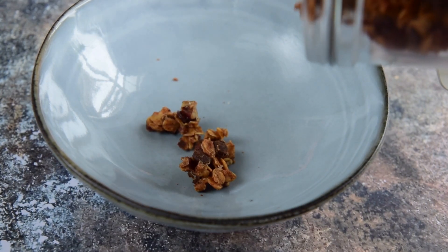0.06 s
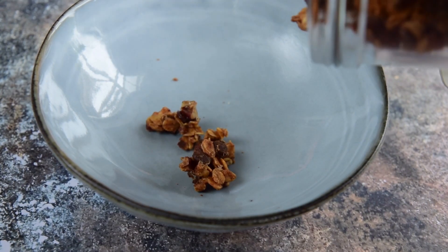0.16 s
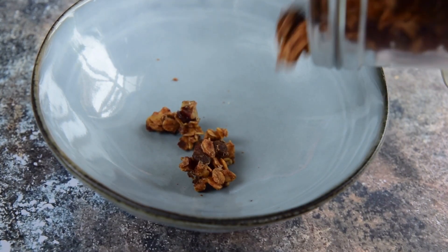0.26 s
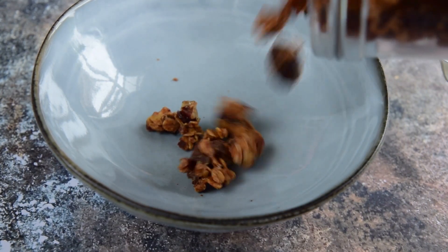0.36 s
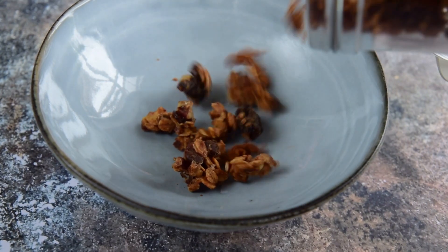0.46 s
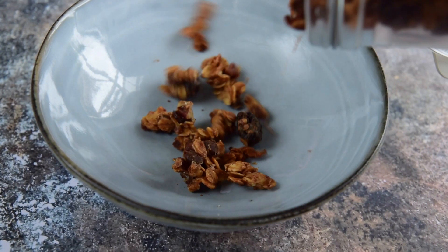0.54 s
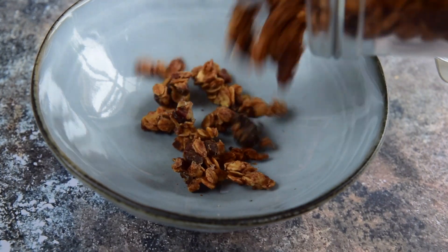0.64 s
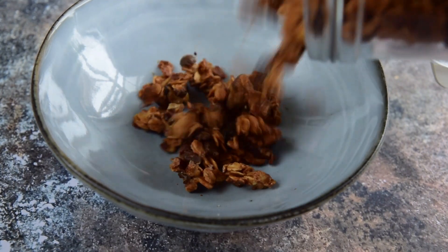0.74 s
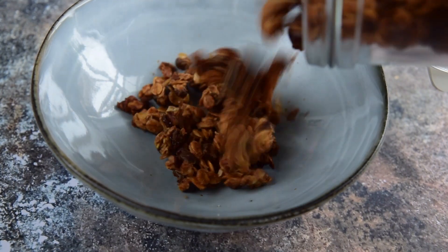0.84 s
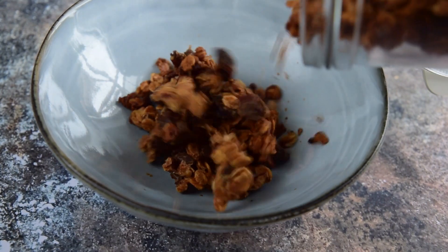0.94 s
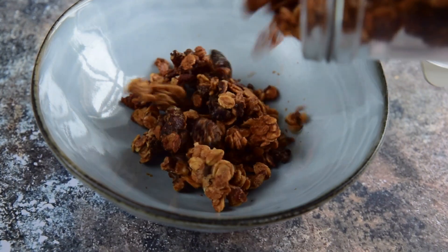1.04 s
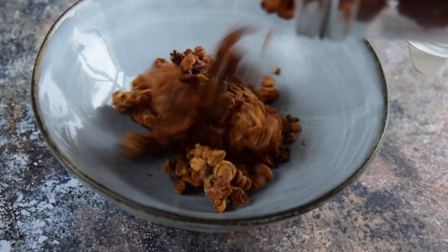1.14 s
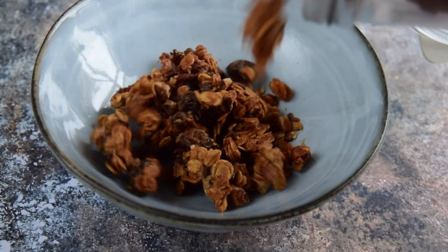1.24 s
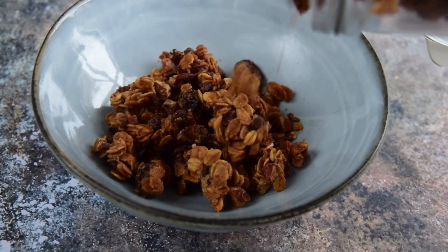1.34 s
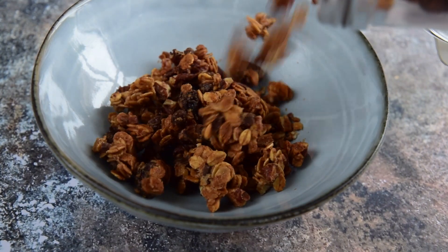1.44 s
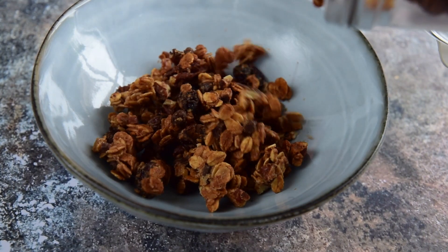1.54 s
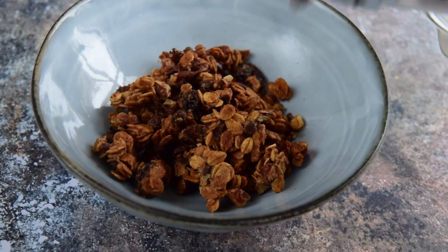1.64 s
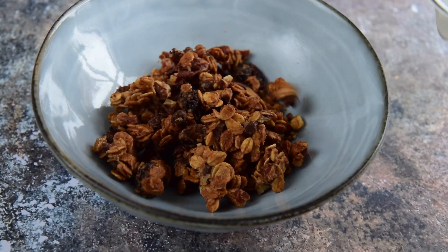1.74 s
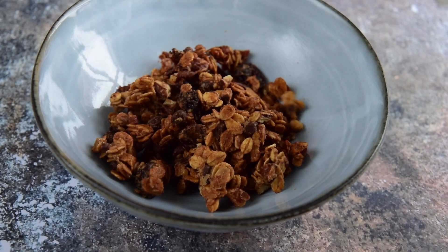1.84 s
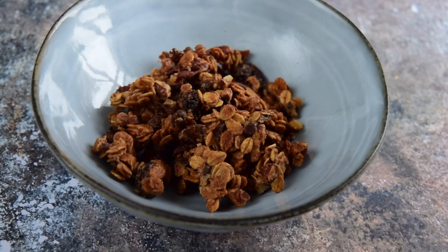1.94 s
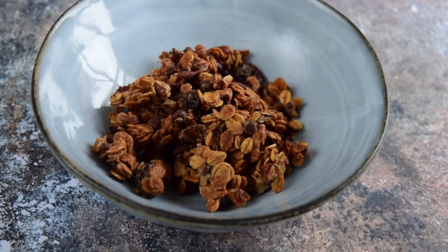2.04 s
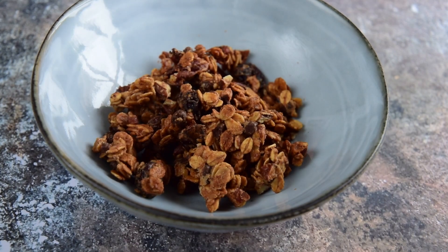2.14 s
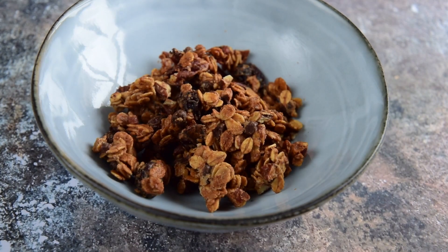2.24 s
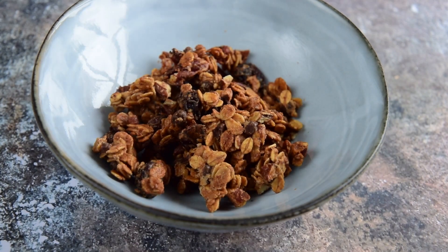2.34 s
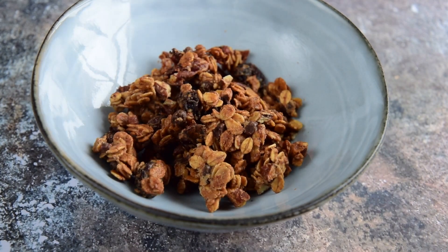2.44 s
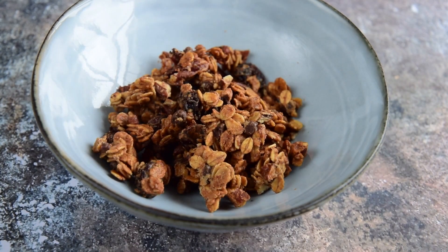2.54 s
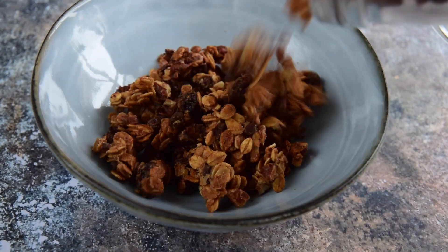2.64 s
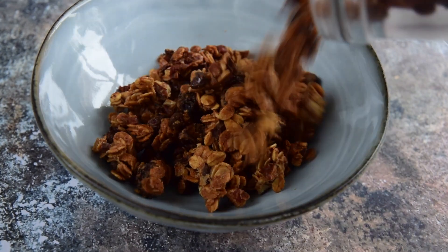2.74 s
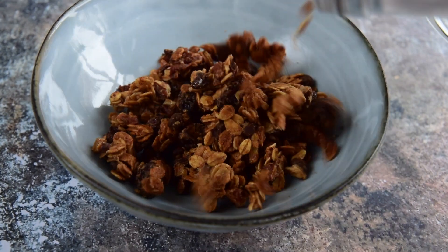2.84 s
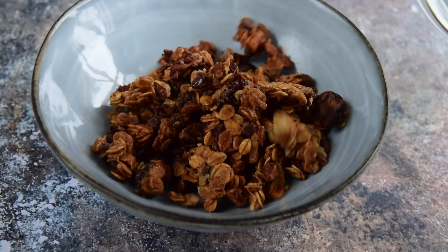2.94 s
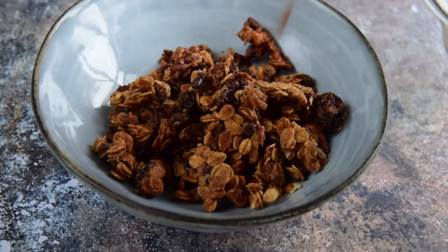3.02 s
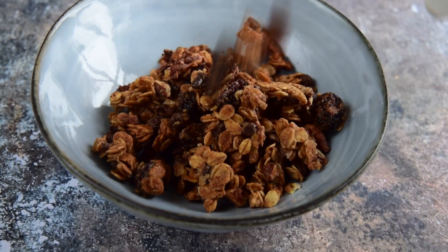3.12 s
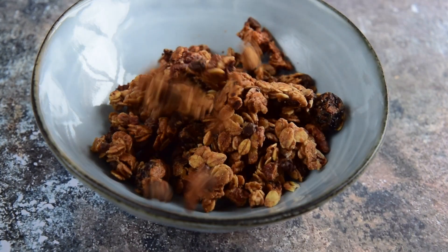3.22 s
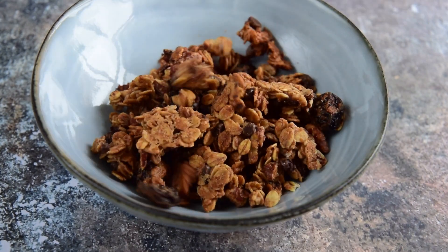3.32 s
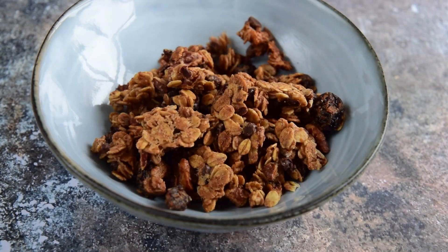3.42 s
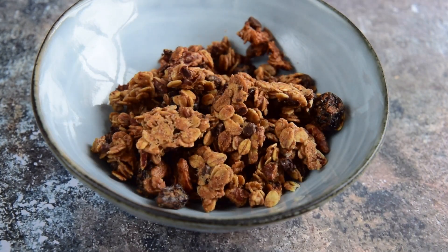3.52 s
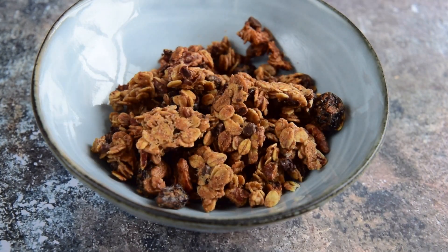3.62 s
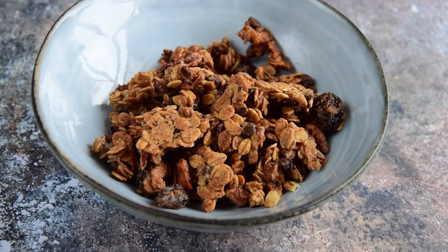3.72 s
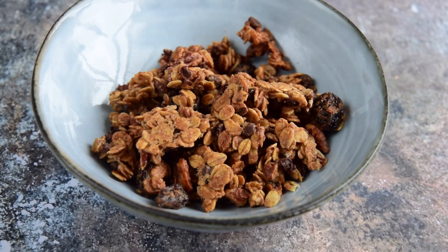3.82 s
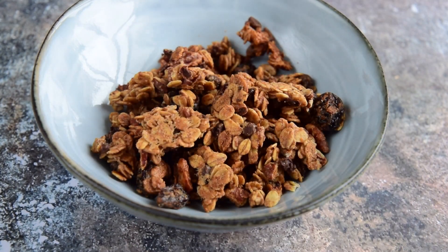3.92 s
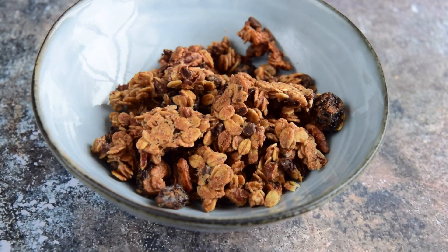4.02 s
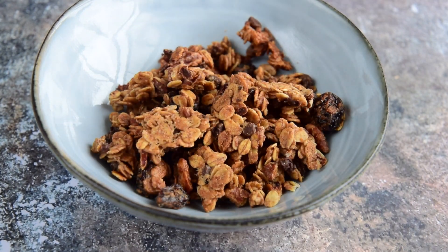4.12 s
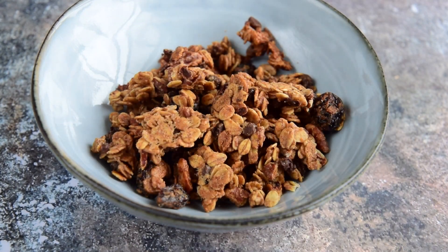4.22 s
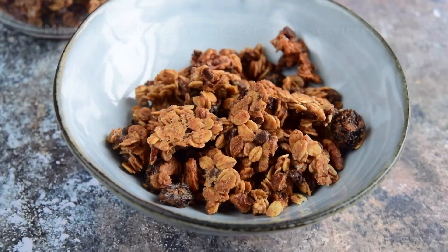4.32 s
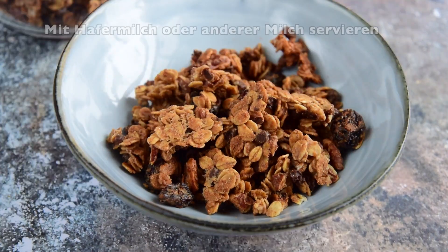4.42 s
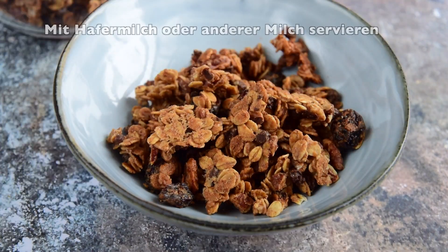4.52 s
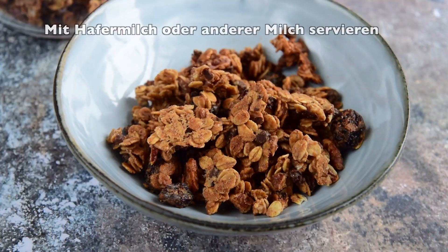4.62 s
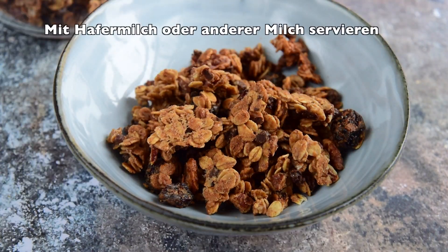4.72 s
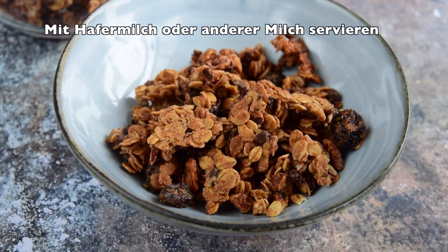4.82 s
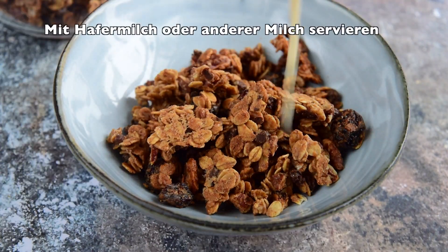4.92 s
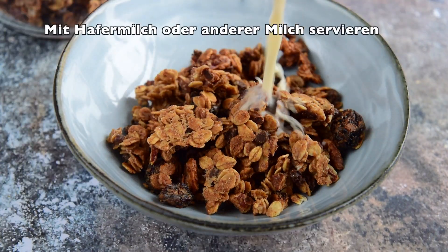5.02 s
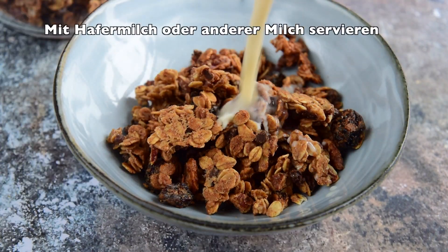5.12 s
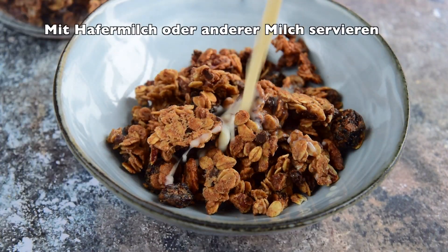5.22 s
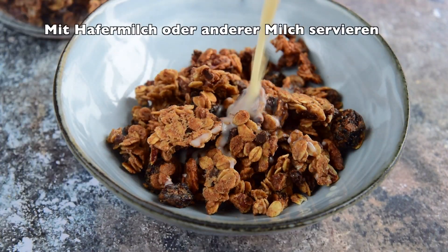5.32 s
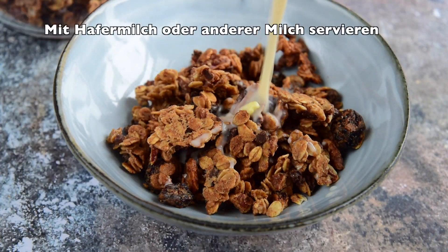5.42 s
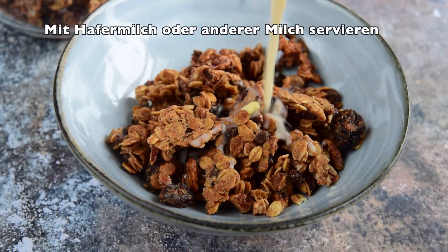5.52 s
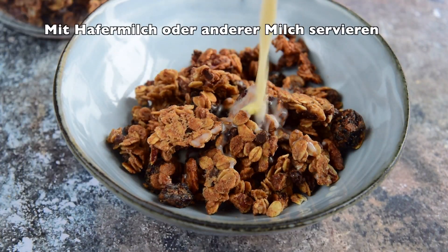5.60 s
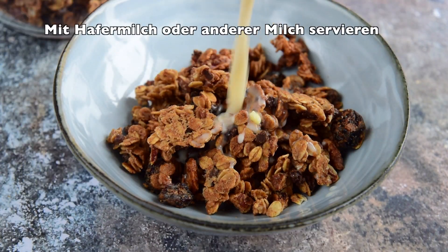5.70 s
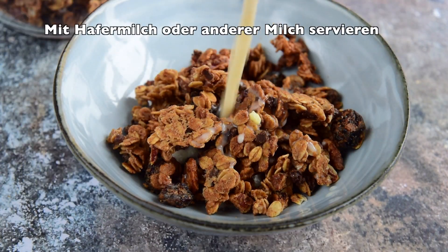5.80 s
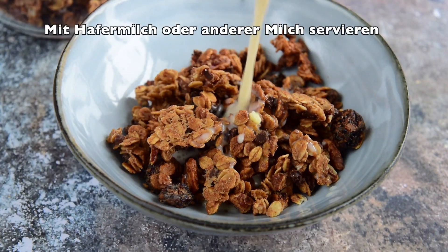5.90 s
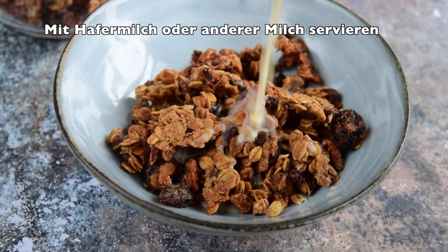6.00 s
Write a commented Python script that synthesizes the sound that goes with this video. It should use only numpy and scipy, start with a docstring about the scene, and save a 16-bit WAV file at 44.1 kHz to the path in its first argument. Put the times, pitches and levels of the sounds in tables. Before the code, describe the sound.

Close in a quiet kitchen, granola scrapes inside a glass jar, then clatters into a ceramic bowl with sharp cracks, dull pops and short bright rings. After a pause, a second, smaller pour follows. The jar rattles, its wire clasp ticks, and it is set down with a loud clack. The background hiss jumps up at a cut, then thin milk spatters, snaps and fizzes over the heap.

```python
"""A quiet kitchen, heard through a nearly mono microphone: granola tumbles from a glass jar into a ceramic bowl.
Two pours: each cluster is a noise crack and a damped dull pop that excite the bowl's modes, over pattering crumbs.
Granola scrapes inside the jar as grains; the jar's glass and wire clasp rattle as modes, and it is set down hard.
After a cut with louder steady noise, milk spatters over the heap: chirped bubbles, snaps, fizz and a gurgle.
"""
import sys
import numpy as np
from scipy import signal
from scipy.fft import rfft, irfft, next_fast_len
from scipy.io import wavfile

SR = 44100
rng = np.random.default_rng(int(sys.argv[2]) if len(sys.argv) > 2 else 0)


def waveform_to_disk(signal):
    """Save audio, clipped to [-1, 1], as 16-bit WAV at the path in sys.argv[1]."""
    frames = np.transpose(np.atleast_2d(signal))
    scaled = np.clip(frames, -1, 1) * 32767
    samples = np.round(scaled).astype(np.int16)
    wavfile.write(sys.argv[1], SR, samples)


N = 266893
CUT_S = 4.335


def amp(db):
    """Decibel law: level to amplitude ratio."""
    return 10 ** (np.asarray(db) / 20)


def unit(x):
    """Normalization to an rms of 1."""
    return x / np.sqrt(np.mean(x ** 2) + 1e-20)


def along(points, hz):
    """Interpolation of (frequency, value) points on a logarithmic frequency axis."""
    f, v = np.transpose(points)
    return np.interp(np.log(hz + 1), np.log(f + 1), v)


def filtered(x, response):
    """Linear filtering: the spectrum times a response of frequency."""
    m = next_fast_len(N + 8192)
    spectrum = rfft(x, m) * response(np.fft.rfftfreq(m, 1 / SR))
    return irfft(spectrum, m)[..., :N]


def shaped(x, spectrum):
    """Spectral coloration by (frequency [Hz], gain [dB]) points."""
    return filtered(x, lambda hz: amp(along(spectrum, hz)))


def train(s, size):
    """Impulsive excitation: one impulse of the given size at each time."""
    return np.bincount(np.round(np.asarray(s) * SR).astype(int), size, N)[:N]


def patter(rate, spread_db):
    """Random impulsive excitation: rate impulses per second on average, very unequal, overall rms 1."""
    size = amp(spread_db * rng.exponential(size=N)) * rng.standard_normal(N)
    return unit(size * (rng.random(N) < rate / SR))


def ring(drive, hz, t60):
    """Modal resonance: an impulse of size 1 starts an exponentially damped sine of size 1."""
    r = amp(-60 / (t60 * SR))
    w = 2 * np.pi * hz / SR
    return signal.lfilter([np.sin(w)], [1, -2 * r * np.cos(w), r * r], drive)


def blips(s, db, hz, cycles, rise):
    """Damped oscillation: short sines with a quick onset, whose pitch climbs with the share rise."""
    t = np.arange(400) / SR
    age = t * (hz / np.clip(cycles, .3, 40))[:, None]  # in lifetimes
    envelope = np.e * 4 * age * np.exp(-4 * age)  # peaks at 1
    chirp = 1 + rise * (np.minimum(age, 2) - .5)
    wave = amp(db)[:, None] * envelope * np.sin(2 * np.pi * hz[:, None] * t * chirp)
    at = np.round(s * SR).astype(int)[:, None] + np.arange(400)
    return np.bincount(at.ravel(), wave.ravel(), N + 400)[:N]


def grains(count, t0, t1, lo_hz, hi_hz, cycles, spread_db, rise):
    """Granular superposition: blips at random times, pitches and sizes; rms 1 while they last."""
    when, size, pitch = rng.random((count, 3)).T
    hz = lo_hz * (hi_hz / lo_hz) ** pitch
    shower = blips(t0 + (t1 - t0) * when, spread_db * size, hz, cycles, rise)
    return unit(shower) * np.sqrt((t1 - t0) * SR / N)


CRACK_S = 0.0067  # t60


def cracks(s, db, lo_hz, hi_hz):
    """Brittle fracture: a brief decaying noise burst at each time; db sets its starting level before the band filter."""
    fade = amp(-60 * np.arange(300) / SR / CRACK_S)
    burst = rng.standard_normal((len(s), len(fade))) * fade
    burst[:, 1:] += 0.68 * rng.uniform(-1.2, 1, (len(s), 1)) * burst[:, :-1]  # some duller, some brighter
    burst *= (amp(db) * np.linalg.norm(fade) / np.linalg.norm(burst, axis=1))[:, None]
    at = np.round(s * SR).astype(int)[:, None] + np.arange(len(fade))
    noise = np.bincount(at.ravel(), burst.ravel(), N + len(fade))[:N]
    band = signal.butter(1, [lo_hz, min(hi_hz, SR / 2.2)], "band", fs=SR)
    return signal.lfilter(*band, noise)


def swells(rows, rise_s):
    """Exponential growth and decay: a gain that rises at each (time [s], level [dB], t60 [s]) and dies away."""
    t = np.arange(N) / SR
    gain = np.zeros(N)
    for s, db, t60 in rows:
        age = np.maximum(t - s, 0)
        gain += amp(db - 60 * age / t60) * (1 - np.exp(-age / rise_s))
    return gain


# kitchen and microphone noise before and after the cut: (frequency [Hz], relative density [dB])
AIR_BEFORE = [(15, -53), (25, -8), (75, -4), (113, -2), (152, -7.5), (189, -6.5), (275, -5), (315, -9),
              (361, -8), (435, -11), (498, -8.5), (555, -12), (618, -10.5), (1310, -15), (15700, -23.5)]
AIR_AFTER = [(15, -37), (25, -11), (55, -2.5), (126, -2), (205, -6), (268, -4.5), (424, -9.5), (854, -7),
             (1630, -11), (1770, -14.5), (4540, -18), (5340, -17.5), (15700, -19)]
# stereo difference: (frequency [Hz], side minus mid [dB])
AIR_SIDE = [(60, -17), (110, -18), (200, -14), (380, -13), (700, -14), (1290, -13), (2380, -9), (4400, -5),
            (8120, -5), (15000, -4)]
AIR_BEFORE_DB, AIR_AFTER_DB = -56, -49  # rms of the mid signal


def air(later):
    """Stationary random noise, louder after the cut; a weak side signal parts left from right."""
    before = unit(shaped(rng.standard_normal((2, N)), AIR_BEFORE))
    after = unit(shaped(rng.standard_normal((2, N)), AIR_AFTER))
    mid, side = np.where(later, amp(AIR_AFTER_DB) * after, amp(AIR_BEFORE_DB) * before)
    side = shaped(side, AIR_SIDE)
    return np.array([mid + side, mid - side])


# the room's decay: (frequency [Hz], t60 [s])
ROOM_DECAY = [(200, 0.96), (2000, 0.23), (10000, 0.13)]


def kitchen(x):
    """Diffuse reverberation: a noise tail in which each frequency dies at its own speed."""
    hz, t, z = signal.stft(rng.standard_normal(SR // 2), SR, nperseg=256)
    decay = amp(-60 * t / along(ROOM_DECAY, hz)[:, None])
    tail = signal.istft(z * decay, SR, nperseg=256)[1]
    delayed = np.pad(x, (250, 0))  # samples
    return signal.fftconvolve(delayed, tail / np.linalg.norm(tail))[:N]


# heavy landings felt through the worktop: (time [s], relative boom level [dB], relative knock level [dB])
THUMPS = [(0.351, -45, -40), (0.385, -45, -45), (.469, -42, -43.5), (0.499, -58, -49), (.698, -41, -42.5),
          (.724, -37, -38), (.817, -40.5, -43.5), (0.878, -39, -47), (0.919, -50, -43.5),
          (0.949, -49, -42.5), (1.157, -38.5, -38), (1.29, -44, -54), (1.329, -40.5, -41),
          (1.386, -44.5, -60), (2.673, -38, -41), (2.77, -37, -49), (2.8, -47, -42.5), (2.849, -48, -56),
          (2.961, -50, -61), (3.16, -49, -50), (3.199, -40.5, -39.5), (3.287, -45.5, -45.5),
          (3.342, -48.5, -67), (3.711, -44, -79)]
# the worktop's low and higher modes: (frequency [Hz], relative level [dB], t60 [s])
BOOM_MODES = [(64.1, -6.5, 0.38), (93.2, 1.5, 0.15)]
KNOCK_MODES = [(184, 3.5, 0.046), (269.3, 4.5, 0.05), (366, -5.5, 0.11)]


def worktop():
    """Structure-borne sound: heavy landings excite the worktop's modes."""
    s, boom_db, knock_db = np.transpose(THUMPS)
    thuds = np.zeros(N)
    for level, modes in ((boom_db, BOOM_MODES), (knock_db, KNOCK_MODES)):
        for hz, db, t60 in modes:
            thuds += ring(train(s, amp(level + db)), hz, t60)
    # a soft push without deep bass
    return filtered(thuds, lambda hz: (1j * hz / (55 + 1j * hz) / (1 + 1j * hz / 450)) ** 2)


# granola shifts inside the jar: (time [s], level [dB], t60 [s])
SLIDES = [(.09, -57, 0.9), (.19, -61, .8), (.26, -58, 0.68), (2.36, -62.5, 1.2), (2.5, -66, .9)]


def slide():
    """Sliding friction as many small impacts: clusters scrape along the tilted jar."""
    scrape = grains(count=1500, t0=0, t1=2.7, lo_hz=890, hi_hz=2610, cycles=3.2, spread_db=18, rise=0)
    return swells(SLIDES, rise_s=0.026) * scrape


# clasp and jar contacts: (time [s], relative glass knock level [dB], relative wire tick level [dB])
RATTLES = [(0.1014, -54, -71), (0.135, -51, -49), (0.163, -45, -52), (0.1966, -45, -52.5),
           (0.2654, -45, -52), (0.3045, -44, -47), (0.5801, -35.5, -43), (2.372, -57, -62),
           (2.4224, -53, -63), (2.438, -48.5, -48.5), (2.511, -55, -52), (2.5628, -54, -54),
           (2.61, -54, -57), (3.6252, -48.5, -60), (3.6804, -47, -54), (3.7352, -60, -54),
           (3.7507, -51, -50), (3.807, -52, -45), (3.8327, -62, -50), (3.8678, -47, -51), (3.961, -52, -42),
           (4.0014, -50, -41), (4.033, -53, -64), (4.1359, -19, -36.5), (4.143, -29.5, -39.5),
           (4.293, -40.5, -47.5), (4.334, -57, -46), (4.4345, -51, -44), (4.4417, -68, -48)]
# modes of the glass and of the wire clasp: (frequency [Hz], relative level [dB], t60 [s])
GLASS_MODES = [(670, -20, 0.021), (856, -19, 0.034), (1001, -14, 0.047), (1290, -13, 0.035),
               (1490, -6.5, .02), (1623, 0.5, 0.022), (1760, -1.5, 0.019), (1890, -6, .018),
               (2170, -11.5, 0.016), (2526, -11, 0.022), (2770, -19.5, 0.014)]
WIRE_MODES = [(4400, -4, .012), (4870, -2, .008), (5250, 0, .008), (5820, -2, .008), (7600, -6, .005),
              (8400, -8, .005), (9400, -9, .005)]


def jar():
    """Impact excitation: a first touch and a short noisy chatter drive the modes of glass and wire."""
    s, glass_db, wire_db = np.transpose(RATTLES)
    t = np.arange(700) / SR
    sound = np.zeros(N)
    for modes, levels, chatter_s in ((GLASS_MODES, glass_db, .03), (WIRE_MODES, wire_db, .015)):
        drive = np.zeros(N + len(t))
        for at, db in zip(s, levels):
            chatter = amp(-11.5 - 60 * t / chatter_s) * rng.standard_normal(len(t))
            drive[round(at * SR):][:len(t)] += amp(db) * ((t == 0) + chatter)
        for k, (hz, db, t60) in enumerate(modes):
            sound += (-1) ** k * amp(db) * ring(drive[:N], hz, t60)  # alternating polarity
    return filtered(sound, lambda hz: hz ** 2 / (hz ** 2 + 700 ** 2))  # small things radiate no bass


# the loudest milk bubbles: (time [s], peak level [dB], frequency [Hz])
SPLATS = [(4.96, -27, 12200), (4.997, -37, 4450), (5.0639, -30.5, 6300), (5.1231, -27.5, 9200),
          (5.195, -31.5, 5680), (5.2294, -32, 4100), (5.22, -25.5, 7600), (5.234, -30, 7840),
          (5.2746, -32, 15600), (5.2914, -32, 4100), (5.3182, -27.5, 4570), (5.329, -25, 6330),
          (5.352, -33, 4280), (5.373, -32.5, 2760), (5.3856, -35, 5430), (5.3885, -22.5, 10600),
          (5.4276, -25.5, 13350), (5.4502, -32.5, 4500), (5.5415, -31, 4020), (5.5552, -26, 11900),
          (5.565, -33, 4440), (5.586, -29, 10800), (5.6376, -32, 13440), (5.695, -31, 9800),
          (5.7039, -33.5, 4300), (5.724, -19.5, 11300), (5.7305, -20.5, 9600), (5.7561, -26.5, 3200),
          (5.7606, -23, 9600), (5.7735, -27.5, 4450), (5.778, -22.5, 9100), (5.812, -31, 6260),
          (5.839, -24.5, 11300), (5.8543, -28, 9470), (5.8834, -16.5, 9270), (5.8869, -25, 2310),
          (5.911, -33, 2350), (5.976, -28.5, 6150), (6.0407, -31, 6370), (6.046, -19.5, 11100)]
# fizz over time: (time [s], relative level [dB])
FLOW = [(4.9, -62), (5.07, -48), (5.16, -50), (5.22, -40.5), (5.42, -47), (5.48, -51), (5.56, -46.5),
        (5.65, -52.5), (5.77, -37), (5.86, -38), (5.97, -41.5), (6.05, -50)]
# colour of the fizz: (frequency [Hz], gain [dB])
FIZZ_TONE = [(1500, -22), (2500, -9.5), (4500, -3.5), (6500, -4), (9500, 3.5), (12000, 3), (16000, -3)]
# air leaves the heap: (time [s], relative level [dB], t60 [s])
GLUGS = [(5.22, -51, 0.76), (5.41, -47.5, 0.31), (5.55, -56, 0.57), (5.67, -50, 0.68), (5.7, -38, 0.23),
         (5.73, -25.5, 0.068), (5.8, -42, 0.86), (5.96, -40.5, 0.38)]
BUBBLE_RISE = .02  # share of pitch
TWIN_DB, TWIN_S = -9.5, 0.0069  # a weaker neighbour bursts within half of TWIN_S before or after each bubble
SNAP_DB = -5  # the snap relative to the bubble's peak


def milk():
    """Bubble resonance: bursts with a snap on the heap, a fizz of tiny bubbles and a gurgle in the heap's gaps."""
    s, db, hz = np.transpose(SPLATS)
    wait, pitch = rng.random((len(s), 2)).T
    s = np.r_[s, s + TWIN_S * (wait - .5)]
    db = np.r_[db, db + TWIN_DB]
    hz = np.r_[hz, 4000 * 3.5 ** pitch]
    bubbles = blips(s, db, hz, 4.6 + hz * 0.00093, rise=BUBBLE_RISE)  # small bubbles last more cycles
    snaps = cracks(s, db + SNAP_DB, lo_hz=2500, hi_hz=14000)

    flow_s, flow_db = np.transpose(FLOW)
    flow = amp(np.interp(np.arange(N) / SR, flow_s, flow_db, -150, -150))  # silent outside the rows
    tiny = grains(count=5000, t0=4.9, t1=6.04, lo_hz=1710, hi_hz=15300, cycles=8.1, spread_db=23, rise=0)
    fizz = flow * shaped(tiny, FIZZ_TONE)

    hollow = unit(ring(patter(rate=400, spread_db=2.5), hz=1630, t60=0.015))
    hollow = filtered(hollow, lambda hz: hz ** 2 / (hz ** 2 + 1100 ** 2))
    gurgle = swells(GLUGS, rise_s=0.005) * hollow
    return bubbles + snaps + fizz + gurgle


# cluster hits: (time [s], crack level [dB], dull pop peak [dB], relative hum level of the lowest mode pair [dB],
# relative ring level of the upper modes [dB], landing spot [0 = rim to 1 = floor])
HITS = [(0.342, -46, -35, -46, -59, .5), (0.354, -18, -37, -50, -37.5, 0.73),
        (0.3839, -19.5, -33, -47, -49, 0.94), (0.4121, -42, -26, -37.5, -58, 0.73),
        (0.4277, -22, -35, -43, -42, 0.69), (0.436, -34, -29, -44, -44, 0.66),
        (0.4594, -29, -40, -70, -52, 0.85), (0.468, -21, -24.5, -57, -37, 0.7),
        (0.4806, -20.5, -22, -53, -33, 0.75), (0.4931, -32, -22, -44, -35.5, 0.78),
        (0.5229, -35, -37, -70, -49, 1), (0.56, -35, -31, -47, -31.5, 0.81),
        (0.6541, -25, -43, -59, -32, 0.8), (0.667, -38, -25, -39, -60, 1),
        (0.692, -34, -42, -40, -51, 0.86), (0.6978, -17, -25, -70, -62, 0.17),
        (0.7125, -41, -26.5, -60, -39, 0.73), (0.7268, -17.5, -21, -48, -32, 0.81),
        (0.746, -36, -42, -34, -58, .9), (0.7696, -29, -49, -34.5, -50, .95),
        (0.778, -37, -45, -70, -34, 0.93), (0.7972, -28, -33, -58, -49, 0.48),
        (0.8024, -25, -43, -70, -33, 0.82), (0.829, -34, -30, -60, -53, 0.14),
        (0.8477, -29, -28, -37, -50, .9), (0.858, -40, -50, -51, -39, 0.87),
        (0.8717, -25, -30, -65, -38, 0.87), (0.906, -33, -49, -39.5, -50, 0.83),
        (0.9272, -31, -36, -38.5, -39.5, 0.85), (0.9721, -56, -30.5, -34, -58, 0.85),
        (1.002, -53, -54, -34.5, -41.5, 0.93), (1.098, -36, -50, -68, -62, 0.81),
        (1.1131, -26.5, -29, -49, -50, 0.59), (1.143, -38, -55, -70, -60, 1),
        (1.158, -32, -29.5, -67, -46, 0.49), (1.1678, -29, -49, -53, -53, 0.7),
        (1.1767, -29, -31, -58, -51, .88), (1.2108, -40, -26.5, -37, -33.5, 1),
        (1.2327, -14.5, -37, -28.5, -26, 0.051), (1.2345, -33, -50, -60, -31.5, 0.6),
        (1.2636, -31, -18.5, -54, -32, 0.22), (1.3052, -30, -51, -58, -44, .1),
        (1.33, -21.5, -23, -45, -37, 0.0086), (1.359, -23, -52, -54, -50, 0.019),
        (1.4117, -51, -33, -69, -57, 0.49), (1.4327, -22, -14.5, -28.5, -33, 0.12),
        (1.4345, -35, -50, -64, -36, 1), (1.478, -36, -52.5, -70, -53, 0.92),
        (1.5092, -28, -44, -48, -40, 0.16), (1.5219, -26, -44, -46, -44.5, 1),
        (1.5284, -26.5, -21.5, -45, -38, 0.15), (1.5392, -29, -43, -70, -49, 1),
        (1.5765, -51, -33, -68, -61, 0), (1.5937, -52, -29.5, -51, -46, 0.16),
        (1.7311, -35, -37.5, -72, -61, .5), (1.7814, -35.5, -31.5, -46.5, -40, 1),
        (1.826, -43, -39.5, -55, -54, 0.24), (2.674, -32, -32, -43, -49, 0.94),
        (2.7117, -45, -47, -41, -42.5, 0.54), (2.761, -29, -43, -57, -43, .9),
        (2.7887, -38, -54, -32.5, -43, 0.6), (2.7951, -34, -47, -45, -40.5, 0),
        (2.8198, -21, -41, -47, -36, 0.37), (2.8485, -25, -34, -70, -34.5, 0.97),
        (2.882, -37, -58, -33, -32.5, 0.18), (2.9154, -37, -41, -70, -43.5, 0.89),
        (2.932, -36, -28.5, -60, -42, 0.52), (2.9435, -29, -49, -50, -39.5, 0.6),
        (2.9788, -46, -26, -52, -54, 0.083), (3.0157, -35, -45, -72, -46, 0.46),
        (3.0266, -27, -34, -59, -42.5, 0.85), (3.075, -30.5, -61, -70, -62, .9),
        (3.1578, -28.5, -37, -73, -55, 0.97), (3.179, -10.5, -26, -38, -42.5, 0.19),
        (3.2, -41, -47, -42, -58, 0.34), (3.2377, -23, -54, -62, -37, 1),
        (3.243, -14, -50, -36.5, -23, 0.31), (3.2445, -27, -50, -58, -28, 0.77),
        (3.2576, -21, -22.5, -73, -35, 0.3), (3.288, -34, -45, -65, -42, 1),
        (3.3009, -23, -37, -46, -29.5, 1), (3.3148, -26, -26.5, -72, -32.5, 0.47),
        (3.3847, -50, -41, -76, -50, 0.56), (3.421, -26.5, -24, -50, -43, 0.2)]
# the bowl's mode frequencies: (frequency [Hz])
BOWL_HZ = [1452, 1468, 2794, 2859, 4524, 4546, 6555, 6620, 7722, 8801, 8938, 9118, 10185, 11157, 11312,
           11555, 13080, 13480, 14490, 15490]
# the same modes in order: (relative level [dB], t60 [s], spot where it rings best [0 = rim to 1 = floor])
BOWL_MODES = [(-1, 0.27, 0), (-9.5, 0.51, 0), (-1.5, 0.38, 0.066), (1.5, 0.37, 0.046), (-17.5, 0.59, 0.17),
              (-1, 0.31, 0.34), (-1, 0.13, .42), (-6, 0.17, 0.47), (-2, 0.069, 0.67), (-2, 0.13, 0.74),
              (-6, 0.081, 0.77), (-3.5, 0.17, 0.78), (-7.5, 0.18, 0.9), (0, 0.077, 0.93), (-20, .12, .99),
              (0.5, 0.11, 0.91), (-5.5, 0.052, .99), (-15, .14, 0.65), (-12, .057, .99), (-15, .091, .99)]
HUM_TOP_HZ = 2000  # top of the lowest pair
REACH, REACH_GROWS = 0.26, 0.15  # spot distance for -10 dB at a medium blow, its growth [dB per dB of ring level]
MEDIUM_DB = -32  # ring level of a medium blow
FAR_DB, FAR_DB_PER_OCTAVE = -16, -13  # least share at the third mode; far blows reach mostly the low modes
CRUMB_SPOT, CRUMB_REACH = .9, 0.47  # crumbs land near the floor; spot distance for -10 dB


def bowl(crumbs):
    """Modal excitation by position: the spot picks the modes, harder blows reach more; crumbs keep it humming."""
    s, crack_db, pop_db, hum_db, ring_db, spot = np.transpose(HITS)
    chance = rng.standard_normal((len(s), len(BOWL_MODES) + 1))
    body_hz = 2100 * amp(.9 * chance[:, -1])
    sound = blips(s, pop_db, body_hz, cycles=2.58, rise=0)  # the cluster's dull body
    sound += cracks(s, crack_db, lo_hz=2680, hi_hz=13500)  # its brittle edge
    reach = REACH * amp(REACH_GROWS * (ring_db - MEDIUM_DB))
    for k, (hz, (db, t60, home)) in enumerate(zip(BOWL_HZ, BOWL_MODES)):
        far = amp(FAR_DB + FAR_DB_PER_OCTAVE * np.log2(hz / BOWL_HZ[2]))
        share = amp(-10 * ((spot - home) / reach) ** 2) + far
        trickle = amp(-10 * ((CRUMB_SPOT - home) / CRUMB_REACH) ** 2) + far
        size = amp(hum_db) if hz < HUM_TOP_HZ else amp(ring_db) * share
        luck_db = hz / 2200 * chance[:, k]  # finer mode patterns depend more on the exact spot
        blows = (-1) ** k * train(s, size * amp(db + luck_db))
        sound += ring(blows + amp(db - 23.5) * trickle * crumbs, hz, t60)
    return sound


# handfuls sliding out of the jar: (time [s], relative crumb patter level [dB], t60 [s])
HANDFULS = [(.345, -53, 0.24), (.44, -53, 0.94), (.69, -51.5, 0.45), (.8, -63, 2.3), (1.155, -60, 0.79),
            (1.32, -62, 0.34), (1.5, -67, 0.45), (2.672, -58.5, 0.88), (2.77, -59, 1.3), (3.17, -62, 1.23),
            (3.415, -77, 0.25)]
# colour of the crumbs: (frequency [Hz], gain [dB])
CRUMB_TONE = [(400, -25.5), (900, -4.5), (2000, 4), (4000, 3.5), (8000, 4.5), (12000, 14.5), (16000, -9)]


def granola():
    """Granular impact noise: crumbs patter around the cluster hits, and bowl and worktop respond."""
    shower = grains(count=5000, t0=.3, t1=3.7, lo_hz=777, hi_hz=15000, cycles=1.05, spread_db=31.0, rise=0)
    crumbs = swells(HANDFULS, rise_s=0.0066) * shower
    return bowl(crumbs) + amp(12) * shaped(crumbs, CRUMB_TONE) + worktop()


def scene():
    """Superposition of direct and reverberant sound: granola and jar up to the cut, then jar and milk."""
    later = np.arange(N) > CUT_S * SR
    heap = granola() + slide()
    glass = jar()
    pour = milk()
    first = heap + glass + kitchen(amp(-12.0) * heap + amp(-8.5) * glass)
    second = glass * later + pour
    second = second + amp(-11.5) * kitchen(second)
    return np.where(later, second, first) + air(later)


TOP_HZ = 15800  # band limit


def record(dry):
    """Band limitation: the microphone keeps nothing above its limit."""
    return filtered(dry, lambda hz: hz < TOP_HZ)


dry = scene()
out = record(dry)
waveform_to_disk(out)
```